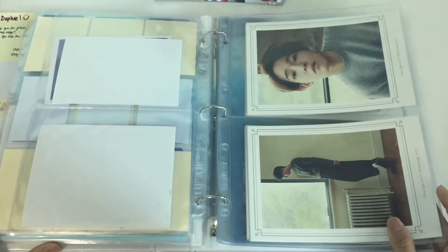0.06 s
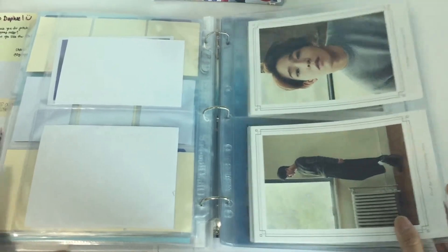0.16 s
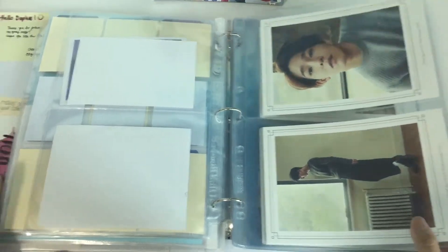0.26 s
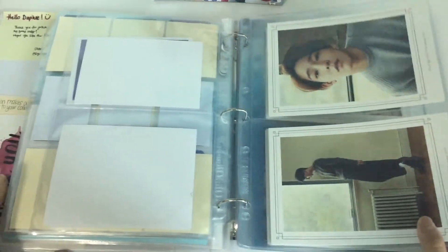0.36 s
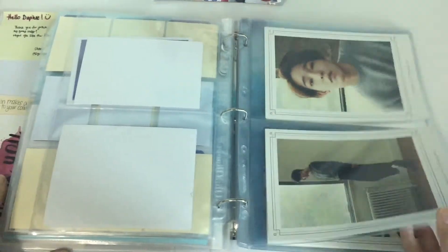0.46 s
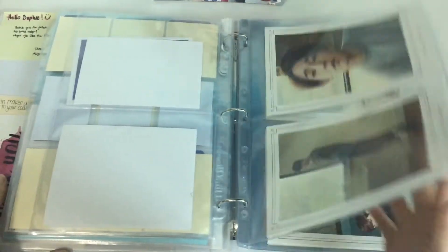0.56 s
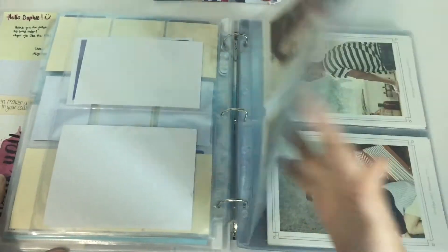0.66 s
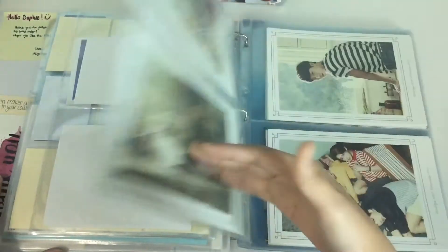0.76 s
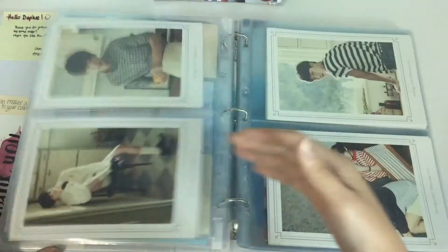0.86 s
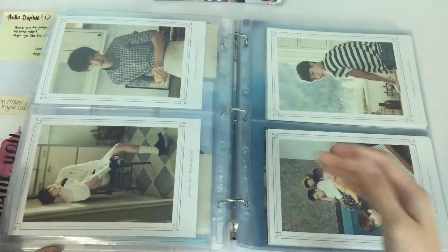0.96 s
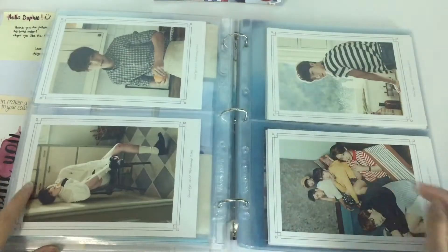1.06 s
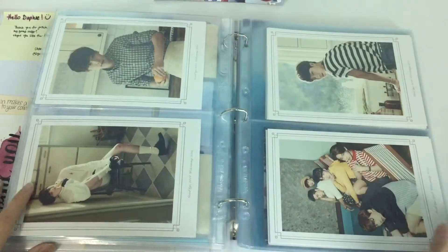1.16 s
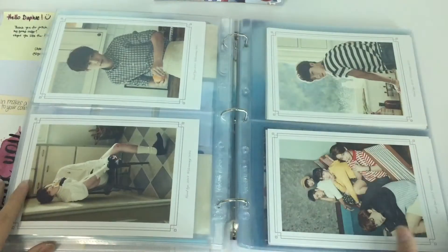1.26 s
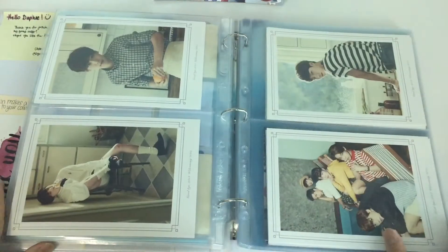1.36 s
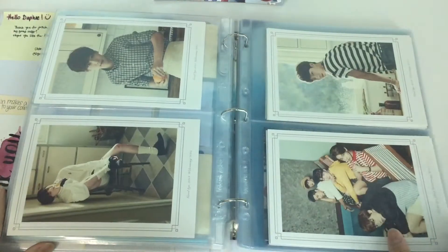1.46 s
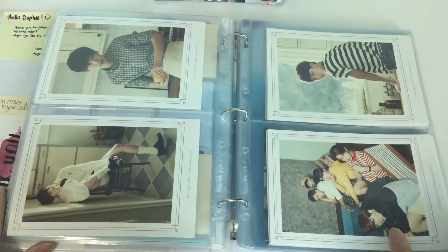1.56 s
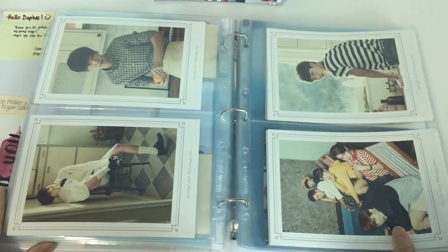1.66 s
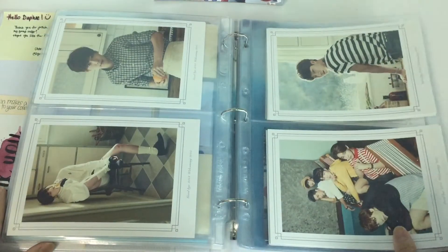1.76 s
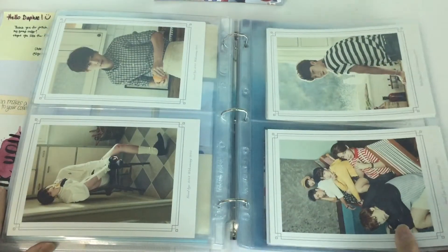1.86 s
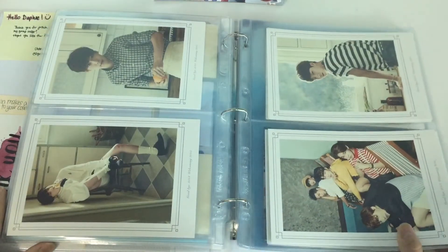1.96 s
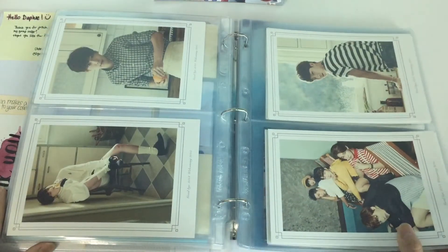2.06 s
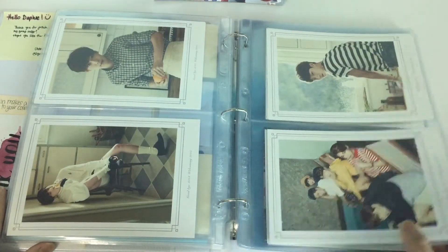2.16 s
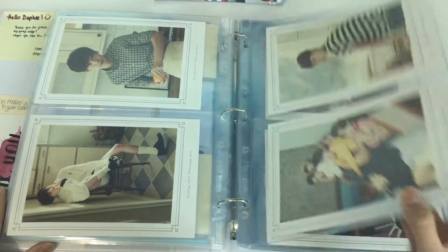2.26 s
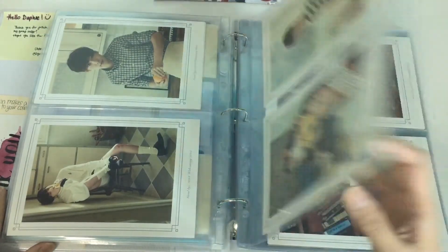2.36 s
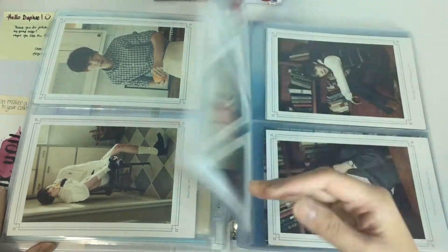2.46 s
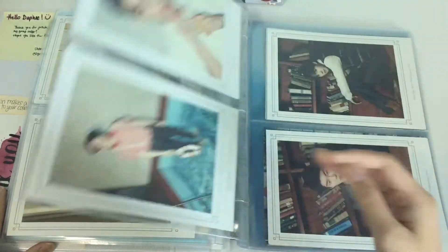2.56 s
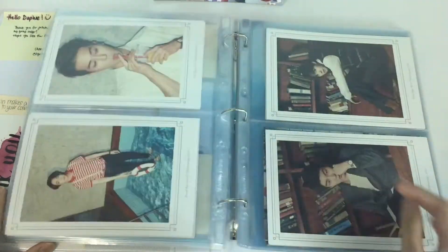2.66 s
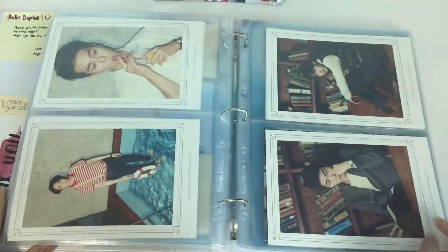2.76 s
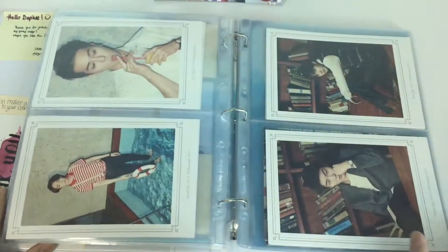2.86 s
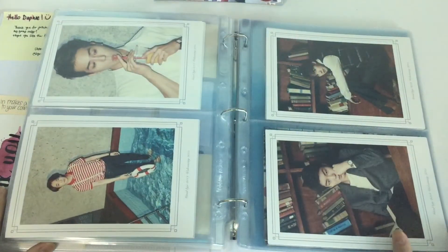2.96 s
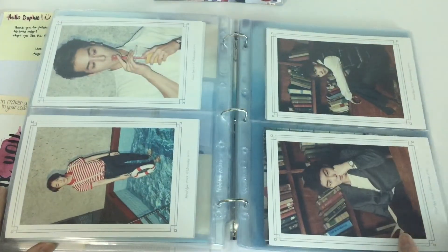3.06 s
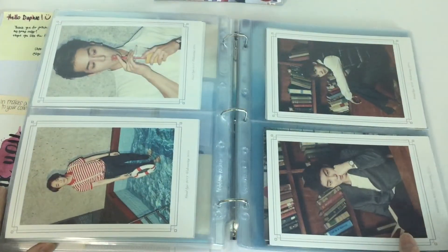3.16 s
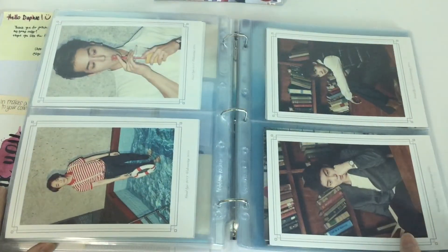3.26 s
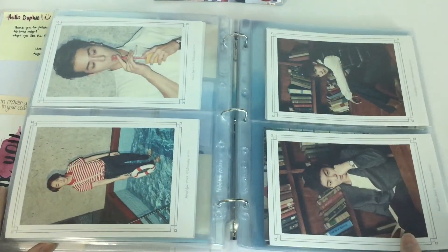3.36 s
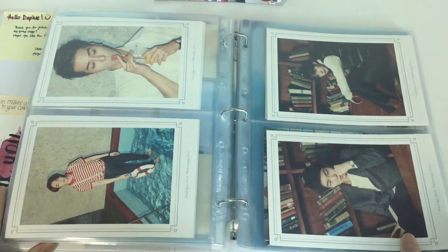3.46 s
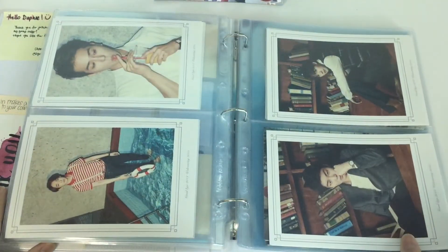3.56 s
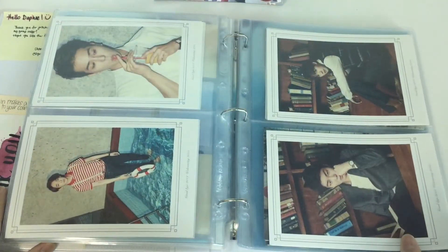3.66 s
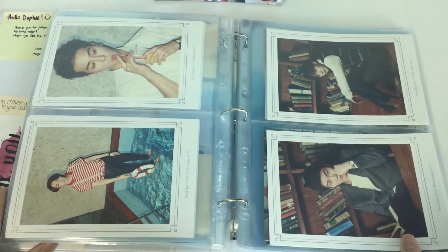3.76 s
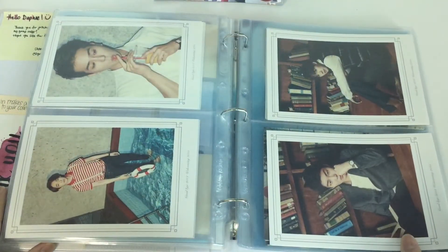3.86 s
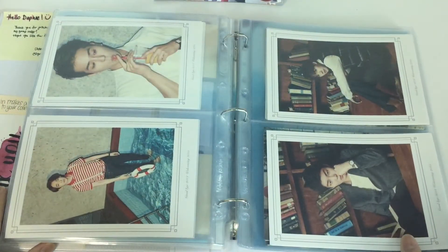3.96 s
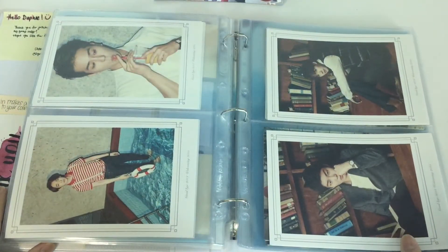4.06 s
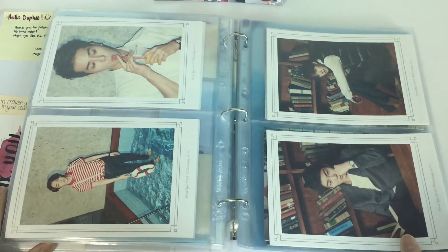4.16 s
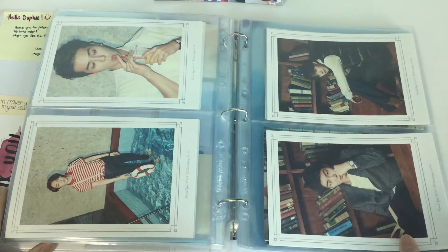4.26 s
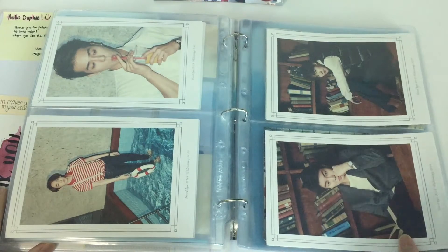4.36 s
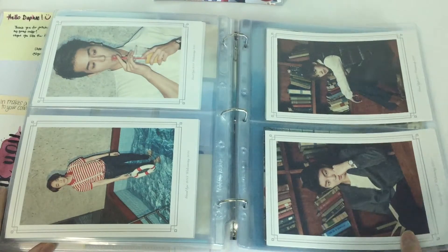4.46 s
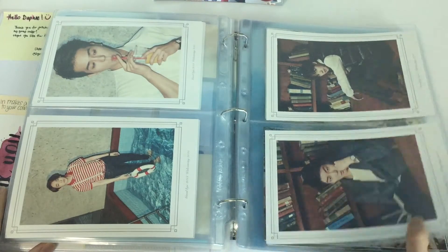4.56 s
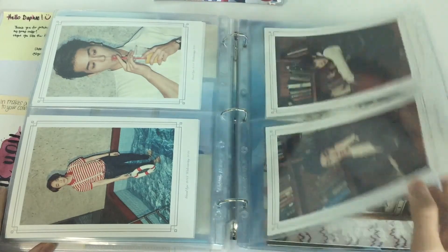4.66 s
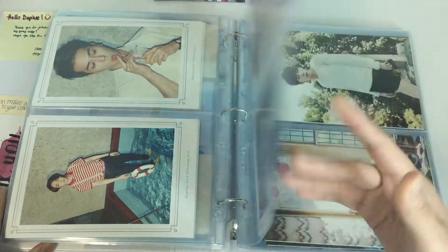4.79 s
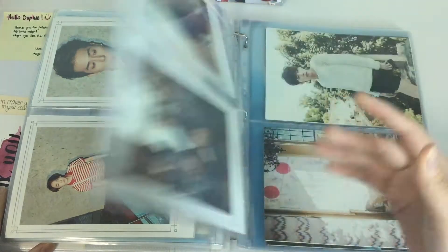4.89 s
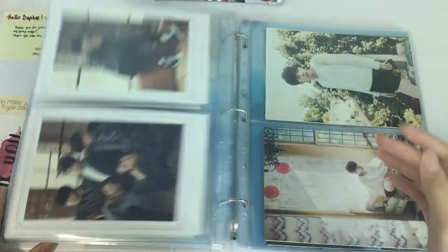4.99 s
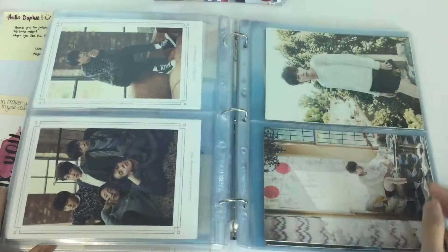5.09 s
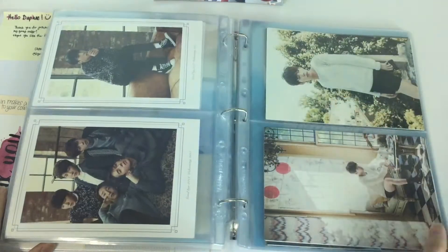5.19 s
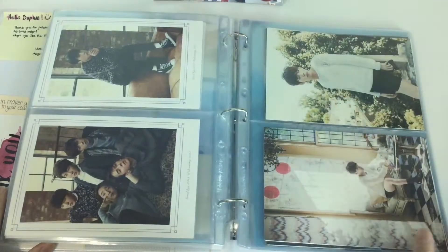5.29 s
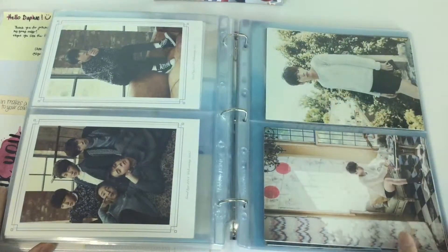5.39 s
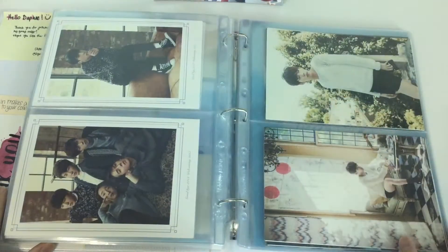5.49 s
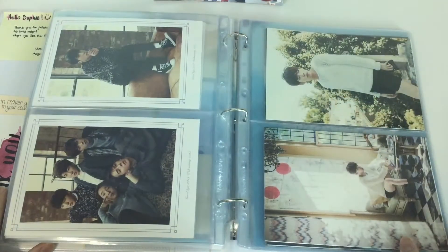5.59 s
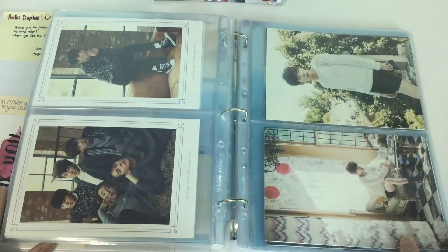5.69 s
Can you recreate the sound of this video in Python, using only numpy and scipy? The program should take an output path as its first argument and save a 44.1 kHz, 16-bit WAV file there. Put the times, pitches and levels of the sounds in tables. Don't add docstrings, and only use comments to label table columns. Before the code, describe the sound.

Close, dry sound of stiff plastic sleeves turned in a ring binder on a desk. A first rustling, snapping turn fills the opening second, a lighter one comes about two and a half seconds in, and the third brings a loud flat slap near 4.8 seconds. Low desk thuds accompany the hands; between turns only faint ticks and soft room tone remain. Small camera microphone, mono.

```python
import sys
import numpy as np
from scipy import signal
from scipy.fft import rfft, irfft
from scipy.io import wavfile
from scipy.ndimage import uniform_filter1d

SR = 44100
rng = np.random.default_rng(int(sys.argv[2]) if len(sys.argv) > 2 else 0)


def generate_wav(signal):
    frames = np.transpose(np.atleast_2d(signal))
    scaled = np.clip(frames, -1, 1) * 32767
    pcm = np.round(scaled).astype(np.int16)
    wavfile.write(sys.argv[1], SR, pcm)


def invert_db(x):
    u = np.asarray(x, float) / 20
    return 10 ** u


N = 252693


def evened(x):
    return x / np.sqrt(np.mean(x ** 2) + 1e-20)


def peaked(x):
    return x / (np.max(abs(x)) + 1e-20)


def read(points, hz):
    f, value = np.transpose(points)
    return np.interp(np.log(hz + 1), np.log(f + 1), value)


def add(mix, start_s, sound):
    part = mix[max(round(start_s * SR), 0):][:len(sound)]
    part += sound[:len(part)]


def smoothed(x, first, second):
    return uniform_filter1d(uniform_filter1d(x, size=first), size=second)


def coloured(x, points):
    hz = np.fft.rfftfreq(len(x), 1 / SR)
    return irfft(rfft(x) * invert_db(read(points, hz)), len(x))


def middle_and_treble(x):
    upper = signal.sosfilt(signal.butter(2, 700, "highpass", fs=SR, output="sos"), x)
    middle = signal.lfilter(*signal.butter(1, 6000, fs=SR), upper)
    return middle, upper - middle


def ring(x, hz, t60_s):
    t = np.arange(round(1.5 * t60_s * SR) + 8) / SR
    mode = invert_db(-60 * t / t60_s) * np.sin(2 * np.pi * hz * t)
    return signal.oaconvolve(x, mode)[:len(x)]


def chance(count):
    return rng.standard_normal(count), rng.exponential(1, count), rng.standard_normal(count)


def patchy(x, clump, depth_db):
    z = rfft(x)
    ripple = evened(smoothed(clump[:len(z)], len(x) // 200, len(x) // 300))
    return irfft(z * invert_db(depth_db * ripple), len(x))


# frequency in Hz, level in dB per Hz.
AIR = [(30, -20), (68, -3), (97, -20.5), (132, -3), (240, -20), (320, -12.5), (450, -23), (680, -23.5),
       (800, -19.5), (980, -25.5), (2700, -32), (6800, -38), (13000, -42.5), (16000, -45)]


def air():
    frames, hz = N // 512 + 5, np.fft.rfftfreq(2048, 1 / SR)
    a, b, patches = rng.standard_normal((frames, 1025, 3)).T
    patches = uniform_filter1d(patches, size=16, axis=0)
    patches = evened(uniform_filter1d(patches, size=8, axis=1))
    z = (a + 1j * b) * invert_db(read(AIR, hz)[:, None] + 0.42 * patches)
    tone = signal.istft(z, nperseg=2048, noverlap=1536)[1][:N]
    return invert_db(-61.5) * evened(tone)


def push(row, phase):
    start_s, peak_db, hz, t60_s = row
    t = np.arange(round(.4 * SR)) / SR
    rise = (1 - np.exp(-t / 0.0045)) ** 2

    def mode(ratio, t60_s):
        swell = peaked(rise * invert_db(-60 * t / t60_s))
        return swell * np.sin(2 * np.pi * (ratio * hz * t + phase))

    main = mode(1, np.clip(t60_s, .04, .6))
    upper = invert_db(-16.5) * mode(1.57, 0.1)
    lower = invert_db(-14.5) * mode(0.613, 0.28)
    return start_s - .006, invert_db(peak_db) * (main + upper + lower)


# time in seconds, peak in dB, mode in Hz, t60 in seconds.
BLOWS = [(.258, -34.5, 138.6, 0.16), (.338, -40, 231.5, 0.064), (.34, -33.5, 130.5, 0.14),
         (.384, -42, 136.6, 0.18), (.436, -34.5, 138, 0.27), (.804, -34.5, 151, 0.22),
         (.94, -41.5, 142.5, 0.17), (.985, -50, 80, .14), (2.379, -45, 135, 0.15), (2.42, -44.5, 220, 0.15),
         (2.448, -49, 128.6, 0.26), (2.525, -48.5, 178, 0.12), (2.575, -54.5, 163, 0.17),
         (2.724, -38, 138, 0.22), (2.739, -45.5, 81, 0.25), (4.7, -52, 122, 0.19), (4.794, -46, 167, .21),
         (4.806, -39, 215, 0.13), (4.896, -35, 136.7, .23), (4.998, -47, 132, 0.11), (5.08, -44, 140, 0.14),
         (5.146, -51, 146, 0.07)]
# time in seconds, peak in dB.
LEANS = [(.08, -55), (0.127, -53.5), (.198, -49), (1.101, -49), (1.146, -53), (1.43, -47.5), (1.601, -54),
         (1.658, -52.5), (1.722, -49.5), (1.968, -52), (3.02, -55.5), (4.594, -51.5)]
# time in seconds, peak in dB.
NUDGES = [(.673, -53), (1.265, -52.5), (1.305, -50.5), (1.38, -51.5), (1.54, -44.5), (1.772, -62),
          (2.241, -55), (2.841, -50), (2.897, -55), (3.067, -55), (3.146, -53), (3.65, -51), (3.811, -53),
          (3.893, -53), (4.116, -58), (4.239, -52.5), (4.328, -49.5), (4.465, -53), (5.244, -55),
          (5.336, -67), (5.64, -61)]


def pushes():
    desk_hz, lean_t60_s, nudge_t60_s = 135.9, 0.42, .15
    leans = [(*row, desk_hz, lean_t60_s) for row in LEANS]
    nudges = [(*row, desk_hz, nudge_t60_s) for row in NUDGES]
    return BLOWS + leans + nudges


# frequency in Hz, level in dB per Hz.
SLEEVE = [(400, -11.5), (900, -9.5), (1600, 5.5), (2500, 1.5), (4500, -4.5), (8000, -11.5), (12000, -16.5),
          (16000, -25)]
# frequency in Hz, level in dB per Hz.
STACK = [(110, -9), (219, 4), (285, 0), (392, -2), (540, -6), (786, -6), (1000, -7.5), (1600, -56)]


def slide(row, chance):
    fullest_s, rustle_db, swell_s, fade_s, treble_db, body_db = row
    noise, size, clump = chance
    swell_s, fade_s = np.clip(swell_s, .002, .04), np.clip(fade_s, .01, .15)
    t = np.arange(len(noise)) / SR - 3 * swell_s
    swelling = np.exp(-.5 * (t / swell_s) ** 2)
    fading = invert_db(-22.0 * (abs(t) / fade_s) ** 1.18)
    shape = np.where(t < 0, swelling, fading)

    grains = noise * invert_db(2.5 * np.minimum(size, 5))
    slips = patchy(grains, clump, depth_db=2.8)
    middle, treble = middle_and_treble(coloured(slips, SLEEVE))
    treble = evened(treble) * invert_db(treble_db) * shape ** 0.93
    body = evened(coloured(noise, STACK)) * invert_db(body_db + 0.5)
    clumping_db = 2.0 * evened(smoothed(clump, 110, 60))
    level = invert_db(rustle_db - 5.0 + clumping_db)
    return fullest_s - 3 * swell_s, (evened(middle) + treble + body) * shape * level


# fullest moment in seconds, rustle in dB, fade in seconds, treble in dB re rustle.
DRAGS = [(.229, -55, 0.11, 1), (.271, -46.5, 0.061, 3), (.35, -46, .07, 5), (.53, -67, 0.097, -8),
         (.732, -50.5, 0.075, -26), (.762, -46.5, 0.064, -20), (.783, -39, .031, 7.5),
         (.812, -39, 0.065, -10), (.936, -40.5, .039, 2), (.962, -48.5, 0.051, -1.5), (2.372, -55, .06, 6),
         (2.399, -46.5, 0.05, -1), (2.423, -47.5, 0.042, 8), (2.462, -43, .04, -11),
         (2.549, -49, 0.041, -17), (2.693, -43.5, .05, -26), (2.728, -41, 0.042, -13),
         (2.84, -59, .05, -15), (4.714, -60, .051, -2), (4.848, -39.5, .06, -28), (4.903, -41.5, 0.067, -6),
         (5.161, -70, 0.17, -6), (5.268, -68, 0.082, 7)]
FLEXES = [(.311, -42, .12, -9.5), (.391, -54.5, 0.047, 2), (.452, -56.5, 0.062, -7), (.493, -38, .024, -24),
          (.86, -50.5, 0.096, -22), (.899, -49, 0.054, -21), (1.263, -71, 0.038, 3),
          (1.536, -71, 0.075, 9.5), (2.238, -51, .05, -11), (2.299, -70, 0.073, -3), (2.501, -62, .06, -16),
          (2.664, -46, 0.074, -29), (4.776, -57, 0.03, 14.5), (4.792, -48, 0.024, 0),
          (5.022, -51, .04, -25), (5.057, -45, 0.039, -18), (5.086, -40, .036, -13)]


def slides():
    swell_share = .21
    kinds = [(DRAGS, -0.5), (FLEXES, -9.5)]
    rows = [(s, rustle_db, swell_share * fade_s, fade_s, treble_db, body_db)
            for table, body_db in kinds
            for s, rustle_db, fade_s, treble_db in table]
    shaken_stack = (4.812, -46, .005, 0.076, -25, 9)
    return rows + [shaken_stack]


# frequency in Hz, level in dB, t60 in seconds.
BINDER = [(370, -3, 0.045), (791, 0, 0.064), (940, -33, 5.0), (1300, -5.5, 0.093)]


def snap(row, chance):
    start_s, peak_db, hz, treble_db, body_db, t60_s = row
    noise, size, clump = chance
    t = np.arange(len(noise)) / SR
    clicks = noise * invert_db(3.9 * np.minimum(size, 4))
    decay = invert_db(-60 * (t / np.clip(t60_s, .005, .12)) ** 0.96)
    dying = decay * np.minimum(t * 1180.0, 1)
    swarm = peaked(clicks * dying) + 2.1 * np.exp(-t * 22000.0)

    sheet_t60_s = min(25.4 / hz, 0.015)
    sheet = peaked(ring(swarm, hz, sheet_t60_s)) + 1.1 * peaked(ring(swarm, 1.63 * hz, 0.0014))
    crackle = coloured(patchy(clicks, clump, depth_db=2.5), SLEEVE)
    middle, treble = (peaked(part * dying) for part in middle_and_treble(crackle))
    plastic = peaked(sum(middle_and_treble(sheet)) + 0.9 * middle)

    binder = sum(invert_db(db) * ring(swarm, mode_hz, np.clip(0.59 * mode_t60_s, .01, .05))
                 for mode_hz, db, mode_t60_s in BINDER)
    binder = peaked(binder - uniform_filter1d(binder, size=200))
    sound = plastic + treble * invert_db(treble_db + 2.5) + binder * invert_db(body_db + 0.5)
    return start_s, invert_db(peak_db) * sound


# start in seconds, peak in dB, ring in Hz.
TICKS = [(.214, -62, 3100), (.554, -50, 840), (0.609, -52, 1900), (1.474, -55.5, 784), (1.879, -56, 1730),
         (2.05, -55.5, 1650), (2.291, -61, 3000), (2.963, -58, 1420), (5.155, -55, 1710), (5.17, -61, 1770),
         (5.27, -62, 4500)]
# start in seconds, peak in dB, ring in Hz, treble in dB re peak.
STACK_SNAPS = [(0.257, -40, 1470, -14), (0.345, -40, 2890, 4.5), (.355, -43.5, 2340, 4),
               (.369, -45, 2190, 5), (.528, -42.5, 760, -34), (.711, -46.5, 810, -20), (.72, -27, 905, -31),
               (.777, -27.5, 4170, 5), (.791, -34, 2070, 5.5), (.938, -27, 4850, -12),
               (.959, -36.5, 1880, -6), (1.396, -50.5, 1690, -15), (2.379, -35.5, 1600, -2.5),
               (2.446, -39, 2100, 0), (2.458, -34.5, 2140, -21), (2.531, -37, 2600, 1.5),
               (2.536, -26.5, 1580, -14), (2.721, -35, 1460, -13), (4.701, -41, 2280, -17),
               (4.711, -45.5, 735, 0), (4.776, -41.5, 3310, 10.5), (4.799, -19.5, 2920, -5.5),
               (4.886, -25, 1540, -3.5), (4.892, -26, 1050, -11.5)]
# start in seconds, peak in dB, ring in Hz, treble in dB re peak, t60 in seconds.
FREE_SNAPS = [(0.268, -47.5, 1450, 9, .06), (0.482, -30, 1740, -17, 0.04), (.49, -30, 2530, -12, 0.026),
              (0.806, -21.5, 1470, -7, .045), (.913, -23, 1850, -16, 0.03), (.929, -28.5, 2190, -20, .05),
              (1.268, -47.5, 2250, -11, 0.032), (2.239, -44.5, 3240, -2.5, .042),
              (2.36, -58, 3560, -3, .025), (2.406, -30.5, 885, -22, 0.015), (2.419, -35, 4250, -0.5, 0.029),
              (2.551, -42.5, 2270, -24, 0.13), (2.689, -30.5, 1610, -24, 0.027),
              (2.7, -29.5, 1350, -18, 0.028), (2.716, -23.5, 1473, -10, 0.032),
              (2.837, -46, 1550, -11, 0.016), (5.007, -33, 1930, -24, 0.027),
              (5.049, -28.5, 2750, -17, 0.027), (5.072, -28, 1500, -22, 0.034),
              (5.078, -37.5, 4870, 2.5, .042)]


def snaps():
    free_body_db = -29
    stack_body_db, stack_t60_s = -7, 0.035
    tick_treble_db, tick_body_db, tick_t60_s = -11, -4, 0.025
    free = [(*row, free_body_db, t60_s) for *row, t60_s in FREE_SNAPS]
    stack = [(*row, stack_body_db, stack_t60_s) for row in STACK_SNAPS]
    ticks = [(*row, tick_treble_db, tick_body_db, tick_t60_s) for row in TICKS]
    return free + stack + ticks


# frequency in Hz, level in dB, t60 in seconds.
SLAPPED = [(396, -1.5, 0.068), (809, -1.5, 0.084), (910, -8, 0.051), (1075, 3.5, 0.033), (1190, -3.5, .03),
           (1340, -13, 0.018), (1570, 0.5, 0.026), (1680, -11, .02), (2000, -2, 0.034), (2060, -13, 0.033),
           (2370, -29, .023), (3000, -23, .025), (3390, -19, .024)]


def slap():
    slap_s, peak_db, blow_s = 4.8, -11, 0.00004
    lead_s, lead_db, delay_s = .0011, -15.5, .002
    t = np.arange(round(.1 * SR)) / SR
    edge = -invert_db(lead_db) * np.exp(-.5 * ((t - delay_s + lead_s) / blow_s) ** 2)
    page = np.exp(-.5 * ((t - delay_s) / blow_s) ** 2)
    modes = sum(invert_db(db) * ring(edge + page, hz, t60_s) for hz, db, t60_s in SLAPPED)
    return slap_s - delay_s, invert_db(peak_db) * peaked(modes)


# frequency in Hz, t60 in seconds.
ROOM = [(200, 0.21), (1000, .22), (4000, 0.091), (15000, 0.069)]


def room(x):
    taps = np.zeros(SR // 2)
    at = np.arange(200, len(taps) - 20, 20)
    taps[at + rng.integers(0, 20, len(at))] = rng.choice([-1., 1.], len(at))
    hz, t, z = signal.stft(taps, SR, nperseg=256)
    decay = invert_db(-60 * t / read(ROOM, hz)[:, None])
    tail = signal.istft(z * decay, SR, nperseg=256)[1]
    return signal.fftconvolve(x, tail / np.linalg.norm(tail))[:N]


def scene():
    tone, pages, desk = air(), np.zeros(N), np.zeros(N)
    for row in pushes():
        add(desk, *push(row, rng.random()))
    for row in slides():
        add(pages, *slide(row, chance(count=12000)))
    for row in snaps():
        add(pages, *snap(row, chance(count=4096)))
    add(pages, *slap())
    return (pages + invert_db(-17.5) * room(pages) + desk + tone)[None]


def low_pass(x):
    return signal.sosfilt(signal.butter(12, 16510, fs=SR, output="sos"), x)


def record(dry):
    low_hz, high_hz = 55, 16100
    x = signal.sosfilt(signal.butter(3, low_hz, "highpass", fs=SR, output="sos"), dry)
    x = signal.oaconvolve(x, signal.firwin(255, high_hz, fs=SR)[None], "same")
    return low_pass(x)


dry = scene()
out = record(dry)
generate_wav(out)
```